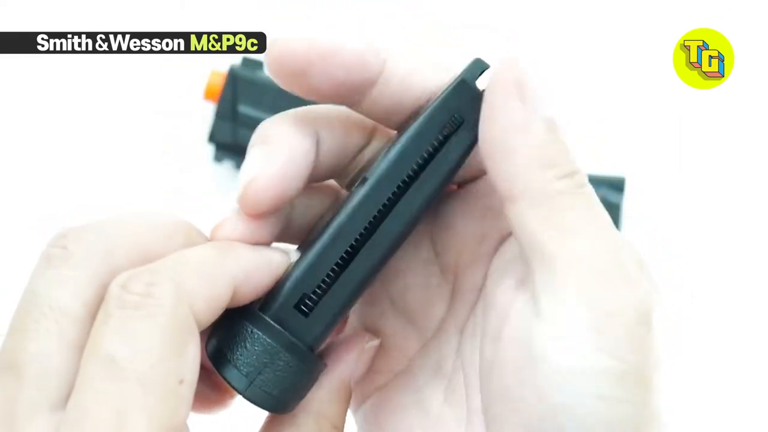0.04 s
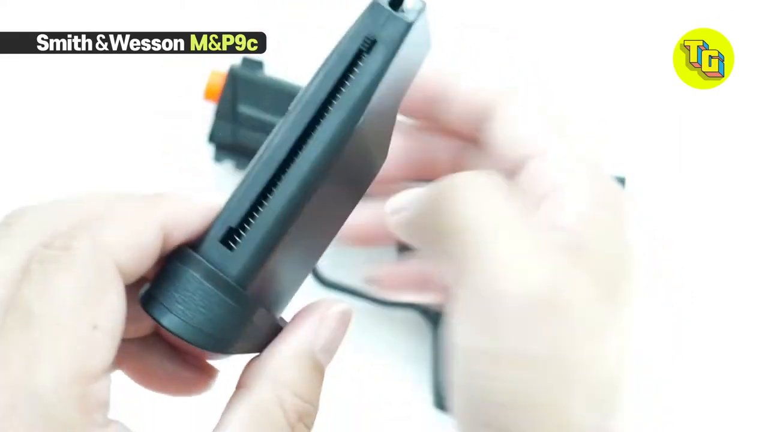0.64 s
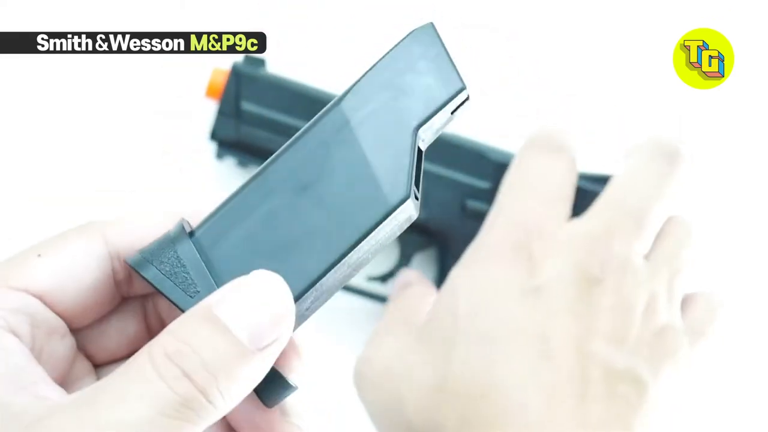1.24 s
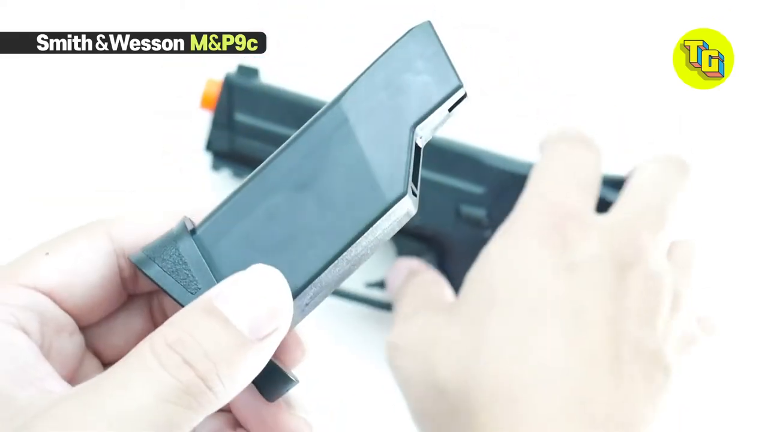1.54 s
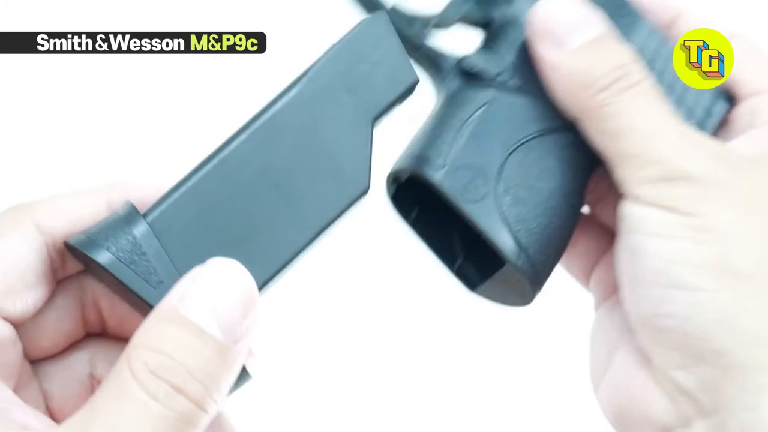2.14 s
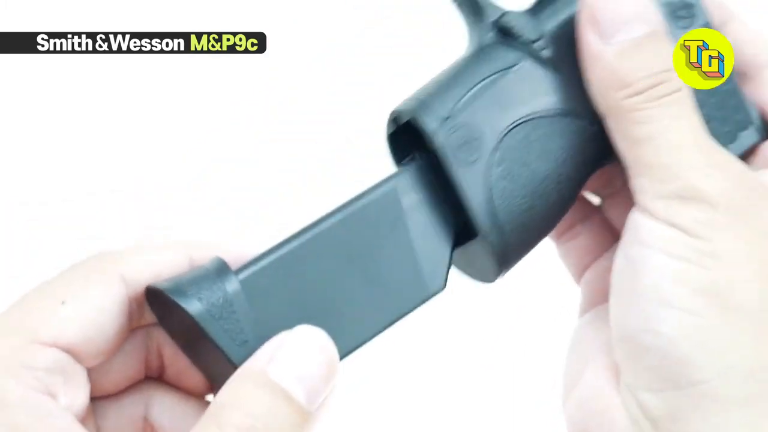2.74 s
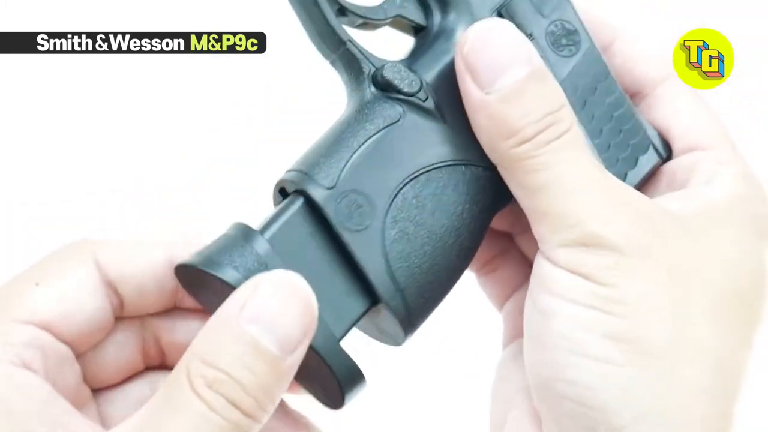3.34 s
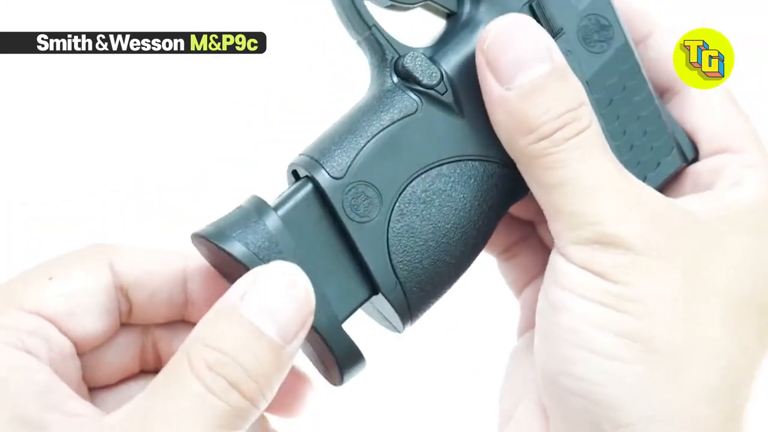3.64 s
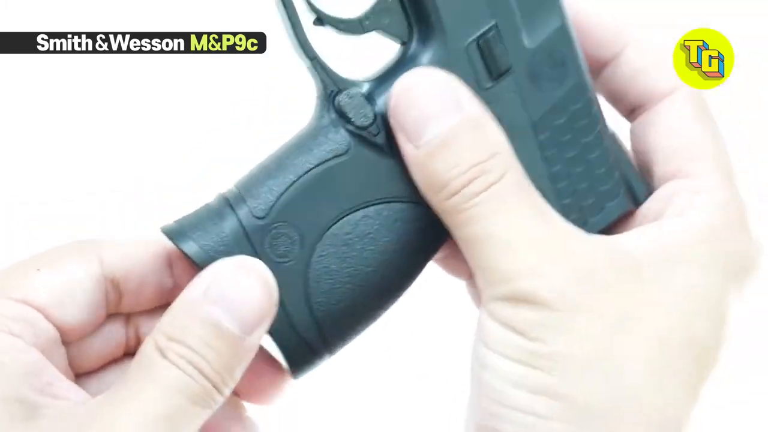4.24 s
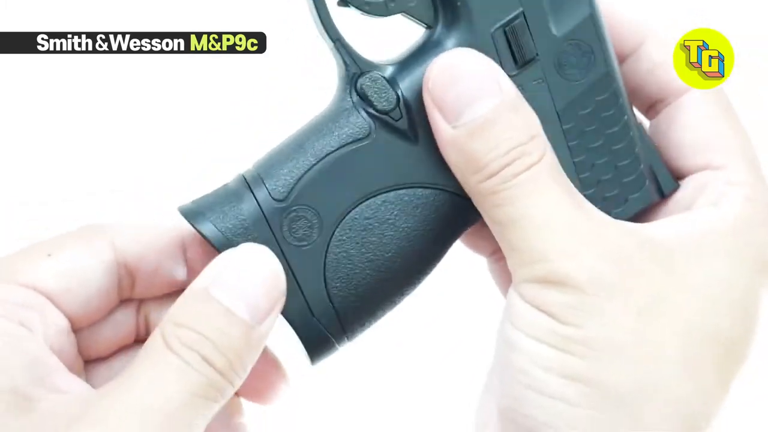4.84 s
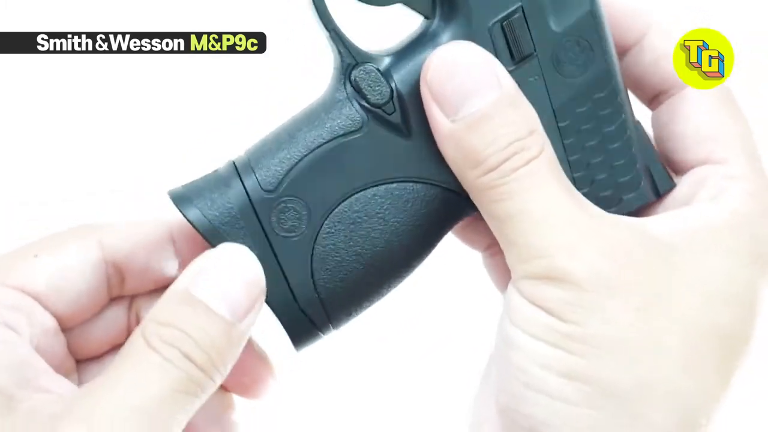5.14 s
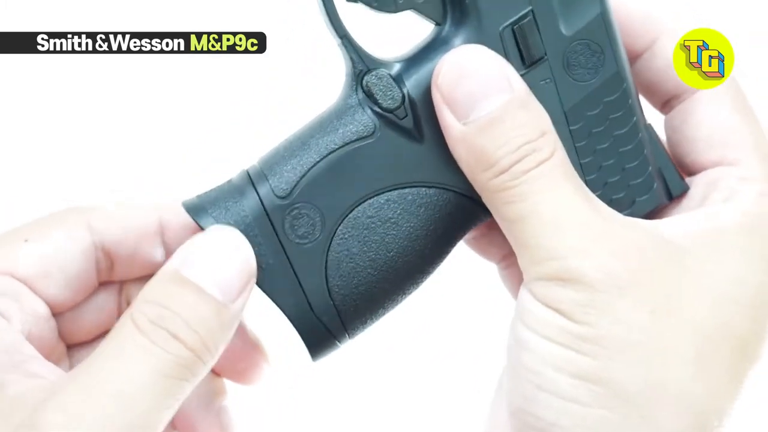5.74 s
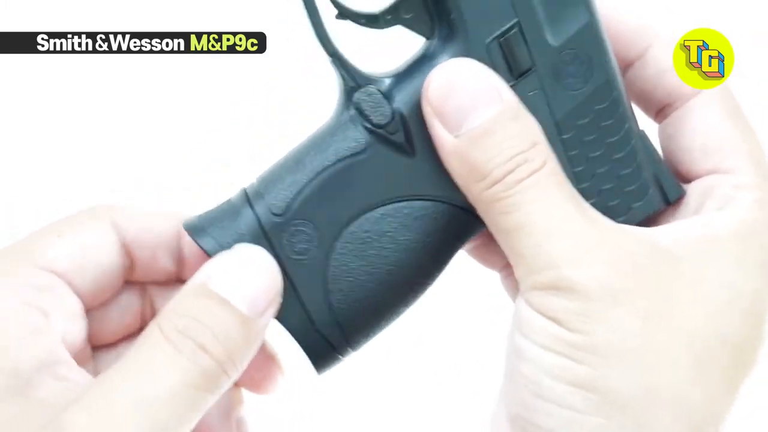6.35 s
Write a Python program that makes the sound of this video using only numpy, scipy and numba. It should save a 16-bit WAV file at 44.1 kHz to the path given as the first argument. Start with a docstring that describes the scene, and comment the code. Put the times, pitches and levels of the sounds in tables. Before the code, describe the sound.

A plastic toy pistol is handled close to the microphone in a small bare room with a short echo. At the start the magazine's spring scrapes and clicks as it is drawn back, then springs home with a loud, bright snap at about 0.4 seconds. From 0.8 to 1.9 seconds come faint finger taps, skin rubs and dull knocks as the pistol is lifted off the table. Around 2.2 seconds the magazine strikes the rim of the grip with a hollow knock, then clatters, snags and scrapes its way inside, thinning out by 3.4 seconds. After two small knocks it latches at about 4.2 seconds with a hard, slightly overloaded snap. From 4.5 to 6.6 seconds the magazine is rocked in its seat, giving light, irregular clicks that grow a little more hollow. The pauses between sounds drop to near silence.

```python
"""A small bare room, close to a plastic toy pistol, the two channels differing only faintly. A thumb draws back
the magazine's follower and lets it snap home; a hand picks up the pistol; the magazine knocks and scrapes its
way into the grip, latches, and is rocked in its seat. Each blow or rub rings the plastic: a crack from the
stiff walls, a hollow note from the shell. The two big snaps overload the recorder, whose noise gate shuts in
the pauses."""
import sys
import numpy as np
from scipy import signal
from scipy.fft import rfft, irfft
from scipy.io import wavfile
from scipy.ndimage import uniform_filter1d
from numba import njit

SR = 44100
rng = np.random.default_rng(int(sys.argv[2]) if len(sys.argv) > 2 else 0)


def dump(signal):
    """Clip the signal to [-1, 1] and save it as 16-bit WAV at the path in sys.argv[1]."""
    limited = np.clip(np.atleast_2d(signal).T, -1, 1)
    pcm = np.round(limited * 32767).astype(np.int16)
    wavfile.write(sys.argv[1], SR, pcm)


N = 290619
RING = 8192  # samples in one blow
FREQS = np.maximum(np.arange(RING // 2 + 1) * SR / RING, 1)
TIME = np.arange(N) / SR

# Levels of blows and rubs are relative: each source's function may add its own offsets.
# The follower catching on its way down: start_s, strength_db
FOLLOWER_CLICKS = [(0.1935, -0.5), (0.2777, -19.5), (0.3188, -8.5)]
# Light finger taps on magazine and frame: start_s, strength_db
FINGER_TAPS = [(0.8163, -26), (0.8274, -21.5), (0.8826, -26.5), (1.0101, -23.5), (1.0217, -29),
               (1.0898, -26.5), (1.2478, -27.5), (1.3924, -30), (1.4376, -9.5), (1.501, -18.5),
               (1.6454, -38.5), (1.7105, -24.5), (1.8598, -30)]
# Dull knocks of the frame on the table: start_s, strength_db
TABLE_KNOCKS = [(1.430, -30.5), (1.4805, -22), (1.6307, -32), (1.6731, -31)]
# The magazine knocking flat against the wall of the well: start_s, strength_db, chatter_ms
WELL_KNOCKS = [(2.235, -1, 11), (2.2706, -12, 4.5), (2.3067, -2.5, 5.4), (2.6807, 5, 7.6),
               (2.7722, -4, 2.5), (2.8023, -15.5, 1.7), (2.8151, 0, 4.2), (2.8723, -11.5, 3.4),
               (3.1404, -8, 9.1), (4.0132, -12, 2.1), (4.1056, -9.5, 3.8)]
# Its edges snagging, thin and bright: start_s, strength_db, chatter_ms
EDGE_SNAGS = [(2.3158, -12, 5.6), (2.3362, 6, 10), (2.3464, 3.5, 5.6), (2.451, -8.5, 8.4), (2.7024, 2, 6.4),
              (2.831, -4, 3.1), (2.9986, 2, 1.5)]
# The magazine clicking against its seat: start_s, strength_db, hollow_hz
SEAT_CLICKS = [(4.4486, -30.5, 1000), (4.4727, -22, 560), (4.616, -24.5, 1040), (4.6341, -8, 670),
               (4.7468, -25, 550), (4.8471, -15.5, 526), (4.9387, -16, 540), (4.998, -24.5, 1010),
               (5.028, -8, 613), (5.131, -20, 790), (5.235, -20, 1010), (5.2478, -25, 771),
               (5.3166, -19, 761), (5.5275, -31.5, 490), (5.5411, -25, 1045), (5.7714, -21, 697),
               (5.8823, -20, 640), (6.0127, -11, 696), (6.098, -13.5, 686), (6.2044, -15.5, 530),
               (6.2736, -13, 763), (6.289, -17, 1330), (6.367, -25, 703), (6.5071, -31, 820),
               (6.5808, -29, 558)]
# Skin sliding on the frame, and the magazine in the well: peak_s, rise_s, pressure_db
HAND_STROKES = [(0.891, 0.048, -49), (1.52, 0.087, -45), (1.757, 0.076, -41), (1.862, 0.017, -34.5)]
WELL_SCRAPES = [(2.336, 0.021, -20), (2.443, 0.015, -38.5), (2.84, 0.015, -25.5), (2.996, 0.0065, -45),
                (3.112, 0.021, -35), (3.152, 0.0085, -37), (3.295, 0.01, -43.5), (3.357, 0.0046, -39.5)]
# Single blows: start_s, crack_db, hollow_db, hollow_hz, crack_hz, chatter_ms
FOLLOWER_SNAP = [(0.3783, 3.5, -12, 1000, 4200, 1.6)]
RIM_KNOCK = [(2.2237, -19, -13.5, 1236, 4800, 3.4)]
CATCH_TOUCH = [(3.364, -27.5, -26.5, 1184, 9210, 16)]
LATCH_SNAP = [(4.161, 2.2, -11, 1100, 9000, 1.6)]
# Strokes against a spring: peak_s, rise_s, fall_s, crack_db, hollow_db
SPRING_SCRAPES = [(0.0, 0.06, 0.063, -42, -56.5), (0.198, 0.002, .028, -19.5, -42.5),
                  (0.275, 0.02, .025, -23.5, -42), (0.375, 0.0045, 0.0028, -16.5, -41.5)]
LATCH_SLIDE = [(4.157, 0.025, 0.0027, -26, -29.5)]
# Soft bumps of hand and pistol, and the low thump under the follower's snap: start_s, level_db, decay_s
LOW_THUDS = [(0.379, -32, 0.002), (0.818, -44.5, 0.067), (1.005, -42.5, 0.02), (1.39, -41.5, 0.023),
             (1.432, -32, 0.017), (1.64, -50, 0.18), (3.067, -38.5, 0.14)]
# Broad colour of each plastic part: frequency_hz, level_db
SPRING_COLOUR = [(120, -57), (200, -22.5), (689, -18), (812, -11.5), (1480, -19), (2130, -6), (2750, -7.5),
                 (3120, 1.5), (5100, 1), (6000, -1), (9290, 4), (12700, -3), (15500, -15.5)]
FOLLOWER_COLOUR = [(120, -68.5), (200, -43.5), (445, -45), (800, -24), (1300, -27.5), (2600, -13.5),
                   (4170, -5), (4650, -2), (6460, -0.5), (12200, -5), (15500, -17.5)]
FRAME_COLOUR = [(120, -45.5), (200, -2), (585, 4.5), (812, 8), (1110, 1.5), (1330, 5), (1910, -6),
                (2330, -3), (4830, -6), (9810, -7.5), (15500, -16)]
GRIP_COLOUR = [(120, -40.5), (200, -17), (429, -10), (652, 0), (1110, -4), (1300, -4), (2460, -13),
               (2750, -10), (4490, -3), (6940, -7), (7890, -4.5), (12900, -13.5), (15500, -28)]
CATCH_COLOUR = [(120, -62.5), (200, -11), (445, -16), (677, -5.5), (1190, -8.5), (1480, -7.5),
                (1590, -17.5), (3350, -11), (5480, -6.5), (11300, -10.5), (15500, -25.5)]
LATCH_COLOUR = [(120, -48), (200, -36.5), (470, -7), (827, -9.5), (939, -12), (1150, -8.5), (1620, -9),
                (2420, -8), (3480, -12.5), (4800, -1.5), (6110, -5), (10600, -6.5), (12700, -9.5),
                (15500, -17)]
SEAT_COLOUR = [(120, -11), (200, -21), (321, -7.5), (629, -4), (905, -6), (1010, -1), (1480, -6.5),
               (2170, -10.5), (2370, -11), (3120, -5), (4020, -9.5), (5580, -5), (7600, -10.5),
               (9990, -7.5), (15500, -31.5)]
# Ringing modes woken at each contact: pitch_hz, width_hz, level_db
SPRING_MODES = [(2130, 81, 3.1), (5060, 600, 4), (5330, 48, 5)]
FOLLOWER_MODES = [(4560, 50, 7), (4716, 28, 13), (4850, 50, 3), (5060, 35, 3), (10700, 400, 3)]
FRAME_MODES = [(660, 17, 6.1), (870, 28, 3.9), (1414, 170, 1.9), (2410, 180, 1.3)]
SKIN_MODES = [(2825, 2800, 0.87)]
RIM_MODES = [(1000, 71, 33), (1160, 74, 12.5), (1334, 41, 38.5)]
GRIP_MODES = [(773, 54, 5.8), (1000, 20, 8.7), (1230, 30, 3.9), (1335, 41, 6.6), (1628, 32, 7.4),
              (2160, 60, 4.5), (2770, 52, 11), (3100, 31, 6.5), (4470, 53, 4), (4580, 40, 3.9),
              (5130, 50, 4.6), (6250, 57, 3.8), (7690, 70, 2), (8040, 22, 5)]
CATCH_MODES = [(4380, 100, 15), (5400, 110, 12), (6250, 90, 7), (9200, 120, 5)]
LATCH_MODES = [(760, 70, 7.8), (1160, 210, 4), (2200, 75, 1.3), (6600, 290, 1.4)]
SEAT_MODES = [(533, 64, 1.3), (670, 220, 1.5), (1010, 13, 3.8), (3550, 41, 1.2), (4600, 410, 4.6),
              (4530, 21, 2.7), (5650, 330, 1.7), (6400, 57, 3.1)]
# Spectrum of the room's steady air, and of its echo: frequency_hz, level_db
AIR_COLOUR = [(25, -1), (60, 2.5), (120, -5), (250, -8.5), (1000, -19.5), (5000, -29), (15000, -39.5)]
ECHO_COLOUR = [(100, -10), (400, -9), (1000, -3), (3000, -2), (8000, -6.5), (15000, 4)]
# Time the echo takes to fall 60 dB: frequency_hz, decay_s
ROOM_T60 = [(150, .6), (530, 0.91), (1400, 0.53), (3700, 0.43), (8000, 0.61), (14000, .42)]


def undb(db):
    """Decibels to gain."""
    return 10 ** (np.asarray(db) / 20)


def unit_rms(x):
    """Scale to rms 1."""
    return x / np.sqrt(np.mean(x ** 2))


def along(points, hz):
    """Read (frequency_hz, value) points on a log-frequency axis."""
    point_hz, value = np.transpose(points)
    return np.interp(np.log(hz), np.log(point_hz), value)


def band(x, low_hz, high_hz):
    """Causal band-pass."""
    return signal.sosfilt(signal.butter(2, [low_hz, high_hz], "band", fs=SR, output="sos"), x)


def add(out, start_s, x):
    """Mix x into out from start_s."""
    i = max(int(start_s * SR), 0)
    out[i:i + len(x)] += x[:max(N - i, 0)]


def impulse_response(gain):
    """Minimum-phase response of a gain curve: sharp attack, then the ring."""
    cepstrum = irfft(np.log(gain + 1e-6))
    cepstrum[1:RING // 2] *= 2
    cepstrum[RING // 2 + 1:] = 0
    return irfft(np.exp(rfft(cepstrum)))


def plastic_part(colour, modes, split_hz=2000):
    """Two gain curves: the crack of the stiff walls above the split, the hollow shell below it."""
    peaks = sum(undb(db) ** 2 / (1 + (2 * (FREQS - hz) / width) ** 2) for hz, width, db in modes)
    gain = undb(along(colour, FREQS)) * np.sqrt(1 + peaks)
    low_share = 1 / (1 + (FREQS / split_hz) ** 8)
    return gain * np.sqrt(1 - low_share), gain * np.sqrt(low_share)


def rubs(rows, colour, modes, slips_per_s, spread_db):
    """Stick and slip: dense uneven slips ring the body while a stroke swells and fades."""
    slips = (rng.random(N) < slips_per_s / SR) * rng.choice([-1, 1], N)
    slips = unit_rms(slips * undb(spread_db * np.clip(rng.standard_normal(N), -2, 2)))
    pressure = np.zeros((2, N))
    for peak_s, rise_s, fall_s, crack_db, hollow_db in rows:
        from_peak = np.maximum((peak_s - TIME) / rise_s, (TIME - peak_s) / fall_s)
        pressure += undb([[crack_db], [hollow_db]]) * np.exp(-np.minimum(from_peak, 20))
    rings = [impulse_response(gain) for gain in plastic_part(colour, modes)]
    return sum(signal.fftconvolve(press * slips, ring / np.linalg.norm(ring))[:N]
               for press, ring in zip(pressure, rings))


def blows(rows, colour, modes, crack_db, hollow_db, tick, loose_db, scuff_db, evenness, clump_db=1):
    """Each blow is a brief scuff, a tick, chatter and a buzz of loose parts, all ringing the body."""
    lead = 900  # samples of scuff ahead of the tick
    out, t = np.zeros(N), (np.arange(RING) - lead) / SR
    after = np.maximum(t, 0)
    for start_s, high_db, low_db, shell_hz, wall_hz, chatter_ms in rows:
        # each point of contact wakes the modes in its own proportions
        woken = [(hz, width, db + 3 * rng.standard_normal()) for hz, width, db in modes]
        walls, shell = plastic_part(colour, woken)
        chatter = np.exp(-1000 * after / chatter_ms)
        buzz = undb(loose_db) * np.exp(-after / .014)
        press = (chatter + buzz) * (1 - np.exp(-after / 0.00067))
        scuff = undb(scuff_db) * np.exp(-np.abs(t) / 0.0032)
        # the surfaces part and meet again about every millisecond, so the chatter comes in clumps
        clumps = np.interp(np.arange(RING), np.linspace(0, RING, num=160), rng.standard_normal(160))
        force = rng.standard_normal(RING) * (press + scuff) * undb(clump_db * clumps)
        force[lead] += tick
        # a broad, flat impact drives all frequencies evenly; a glancing one is patchy
        flatten = uniform_filter1d(np.abs(rfft(force)) ** 2, size=24) ** (-evenness / 2)
        # the place of contact favours one region of the walls and one of the shell
        walls *= undb(3.4 * np.exp(-(np.log2(FREQS / wall_hz) / 0.21) ** 2))
        shell *= undb(6.1 * np.exp(-(np.log2(FREQS / shell_hz) / 0.42) ** 2))
        for gain, db in ((walls, high_db + crack_db), (shell, low_db + hollow_db)):
            hit = signal.fftconvolve(force, impulse_response(gain * flatten))[:RING]
            loudest = np.sqrt(uniform_filter1d(hit ** 2, size=220, mode="constant").max())
            add(out, start_s - lead / SR, hit * undb(db) / loudest)
    return out


def contact(start_s, db, shell_hz, wall_hz, chatter_ms, ring_db=0):
    """One row for blows(): harder is brighter, and the place of contact wanders a little."""
    scatter_octaves, hollow_db_per_db = np.array([0.067, 0.25]), 0.75
    shell, wall = 2 ** (scatter_octaves * rng.standard_normal(2))
    return start_s, db, ring_db + hollow_db_per_db * db, shell_hz * shell, wall_hz * wall, chatter_ms


def slide(peak_s, rise_s, db, hollow_db, fall_ratio):
    """One row for rubs(): pressing adds mostly hiss, and a slow swell also fades slowly."""
    return peak_s, rise_s, fall_ratio * rise_s, db, hollow_db + 0.23 * db


def room_air(level_db):
    """Room tone: a low steady rumble and faint hiss."""
    hz = np.maximum(np.arange(N // 2 + 1) * SR / N, 1)
    spectrum = rfft(rng.standard_normal(N)) * undb(along(AIR_COLOUR, hz))
    return undb(level_db) * unit_rms(irfft(spectrum, N))


def follower_draw():
    """The thumb drags the follower down; the spring scrapes and catches in its channel."""
    clicks = [contact(s, db, shell_hz=1980, wall_hz=6000, chatter_ms=4.3) for s, db in FOLLOWER_CLICKS]
    return (blows(clicks, SPRING_COLOUR, SPRING_MODES, crack_db=-14, hollow_db=-32.5,
                  tick=2, loose_db=-4, scuff_db=-2.5, evenness=0.18)
            + rubs(SPRING_SCRAPES, SPRING_COLOUR, SPRING_MODES, slips_per_s=2700, spread_db=2.5))


def follower_snap():
    """Let go, the follower springs home in one flat, bright blow."""
    return blows(FOLLOWER_SNAP, FOLLOWER_COLOUR, FOLLOWER_MODES, crack_db=-1.5, hollow_db=2.5,
                 tick=1.5, loose_db=-40, scuff_db=-32, evenness=1)


def low_thuds():
    """Dull, short thuds: flesh against plastic, and the low thump under the follower's snap."""
    out, t = np.zeros(N), TIME[:SR // 2]
    for start_s, db, decay_s in LOW_THUDS:
        thud = band(rng.standard_normal(len(t)) * np.exp(-t / decay_s), 29, 135)
        loudest = np.sqrt(uniform_filter1d(thud ** 2, size=440).max())
        add(out, start_s, undb(db) * thud / loudest)
    return out


def pistol_pickup():
    """Fingers tap and rub the frame, which knocks dully on the table as it is lifted."""
    taps = [contact(s, db, shell_hz=720, wall_hz=2784, chatter_ms=0.77) for s, db in FINGER_TAPS]
    knocks = [contact(s, db, shell_hz=1106, wall_hz=2600, chatter_ms=3.64) for s, db in TABLE_KNOCKS]
    strokes = [slide(*row, hollow_db=-44, fall_ratio=1) for row in HAND_STROKES]
    return (blows(taps, FRAME_COLOUR, FRAME_MODES, crack_db=-13, hollow_db=-23,
                  tick=1.6, loose_db=-17.5, scuff_db=-15.5, evenness=0.14)
            + blows(knocks, FRAME_COLOUR, FRAME_MODES, crack_db=-19, hollow_db=-12.5,
                    tick=4.9, loose_db=-23.5, scuff_db=-21.5, evenness=0.29)
            + rubs(strokes, FRAME_COLOUR, SKIN_MODES, slips_per_s=4900, spread_db=6.5))


def magazine_insertion():
    """The magazine strikes the rim, knocks, snags and scrapes up the well, and meets the catch."""
    knocks = [contact(s, db, shell_hz=1100, wall_hz=4500, chatter_ms=ms) for s, db, ms in WELL_KNOCKS]
    snags = [contact(s, db, shell_hz=1200, wall_hz=5200, chatter_ms=ms) for s, db, ms in EDGE_SNAGS]
    scrapes = [slide(*row, hollow_db=-22.5, fall_ratio=1.16) for row in WELL_SCRAPES]
    return (blows(RIM_KNOCK, GRIP_COLOUR, RIM_MODES, crack_db=0, hollow_db=-5.5,
                  tick=4.8, loose_db=-2, scuff_db=-59, evenness=0.2)
            + blows(knocks, GRIP_COLOUR, GRIP_MODES, crack_db=-23.5, hollow_db=-23.5,
                    tick=6.1, loose_db=-2, scuff_db=-35, evenness=0.15, clump_db=-2)
            + blows(snags, GRIP_COLOUR, GRIP_MODES, crack_db=-24.5, hollow_db=-31.5,
                    tick=4.3, loose_db=-14, scuff_db=-20, evenness=0.19, clump_db=0.5)
            + rubs(scrapes + LATCH_SLIDE, GRIP_COLOUR, GRIP_MODES, slips_per_s=1800, spread_db=2.5)
            + blows(CATCH_TOUCH, CATCH_COLOUR, CATCH_MODES, crack_db=4, hollow_db=-4.5,
                    tick=3.2, loose_db=-31, scuff_db=-31.5, evenness=0.32))


def latch_snap():
    """The latch snaps shut on the magazine in one hard, flat blow."""
    return blows(LATCH_SNAP, LATCH_COLOUR, LATCH_MODES, crack_db=-1.5, hollow_db=-1.5,
                 tick=1.5, loose_db=-38, scuff_db=-38, evenness=1)


def magazine_rocking(rebound_s=0.011, hollow_db_per_s=1):
    """The latched magazine clicks to and fro in its slack, ever more hollow, rebounding each time."""
    clicks, first_s = [], SEAT_CLICKS[0][0]
    for start_s, db, hz in SEAT_CLICKS:
        ring_db = hollow_db_per_s * (start_s - first_s)
        clicks.append(contact(start_s, db, shell_hz=hz, wall_hz=4270, chatter_ms=2.4, ring_db=ring_db))
        back_s = start_s + rebound_s * rng.uniform(.5, 2)
        back_db = -19.5 + 0.67 * db
        clicks.append(contact(back_s, back_db, shell_hz=hz, wall_hz=4800, chatter_ms=3.8))
    return blows(clicks, SEAT_COLOUR, SEAT_MODES, crack_db=-15.5, hollow_db=-20.5,
                 tick=5, loose_db=-8, scuff_db=-13, evenness=0.25, clump_db=4.5)


def room_echo(x, early_db, early_s, late_db):
    """The echo alone: quick reflections off the table, then the even tail of a bare small room."""
    t = TIME[:SR]
    hz = np.maximum(np.arange(SR // 2 + 1), 1)
    noise = rfft(rng.standard_normal(SR)) * undb(along(ECHO_COLOUR, hz))
    octave = np.round(4 * np.log2(np.maximum(hz, 128))) / 4  # quarter-octave bands
    tail = sum(irfft(noise * (octave == k), SR) * undb(-60 * t / along(ROOM_T60, 2 ** k))
               for k in np.unique(octave))
    tail *= np.clip((t - .004) / 0.0042, 0, 1)
    early = rng.standard_normal(SR) * (rng.random(SR) < .08) * np.exp(-t / early_s) * (t > .003)
    echo = undb(early_db) * early / np.linalg.norm(early) + undb(late_db) * tail / np.linalg.norm(tail)
    return signal.fftconvolve(x, echo)[:N]


def stereo_width(x, side_db):
    """A faint, diffuse blur of the sound is added to one channel and taken from the other, so the two differ
    only slightly."""
    scatter = rng.standard_normal(RING) * np.exp(-TIME[:RING] / .02)
    side = undb(side_db) * signal.fftconvolve(x, scatter / np.linalg.norm(scatter))[:N]
    return np.array([x + side, x - side])


def scene():
    """The pistol close in front of the microphone, with the room behind it."""
    snap, latch = follower_snap(), latch_snap()
    handling = follower_draw() + pistol_pickup() + magazine_insertion() + magazine_rocking()
    # the slim magazine sends little of its snap's bass as far as the walls
    radiated = handling + band(snap, 2300, 18000) + undb(0.5) * latch
    echo = room_echo(radiated, early_db=-19, early_s=.02, late_db=-8.3)
    close = handling + snap + latch + low_thuds()
    return stereo_width(close + echo + room_air(level_db=-54), side_db=-27)


@njit
def hold_peaks(level, fall):
    """Follow a level up at once and let it sink by a factor each sample."""
    out, held = np.empty(len(level)), 0.
    for i in range(len(level)):
        held = max(level[i], held * fall)
        out[i] = held
    return out


def noise_gate(x, threshold_db, slope, release_s, depth_db, ahead_s):
    """Deaf to rumble, the gate opens just before a sound and turns down as the held level sinks."""
    level = np.sqrt(np.abs(uniform_filter1d(band(x[0], 400, 15000) ** 2, size=220)))
    held = hold_peaks(level, np.exp(-1 / (release_s * SR)))
    held_db = 20 * np.log10(np.interp(TIME + ahead_s, TIME, held) + 1e-9)
    gain_db = np.clip(slope * (held_db - threshold_db), depth_db, 0)
    return x * uniform_filter1d(undb(gain_db), size=130)


def record(dry):
    """The recorder's input clips on the snaps, its gate mutes the pauses, and the top is cut."""
    clipped = np.clip(dry, -.85, .85)
    gated = noise_gate(clipped, threshold_db=-41.5, slope=2.09, release_s=0.058, depth_db=-60,
                       ahead_s=0.0073)
    top_hz = 15500
    return signal.sosfilt(signal.ellip(8, .2, 70, top_hz, fs=SR, output="sos"), gated)


dry = scene()
out = record(dry)
dump(out)
```